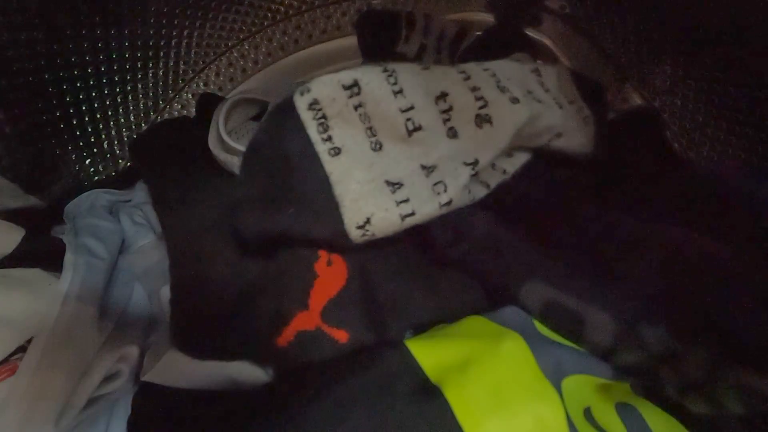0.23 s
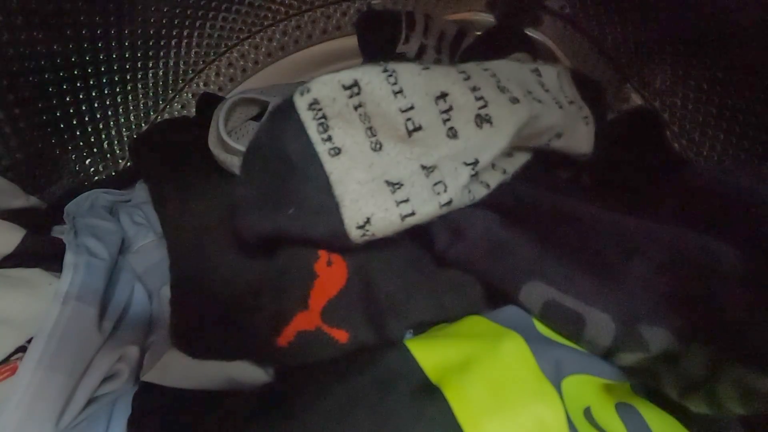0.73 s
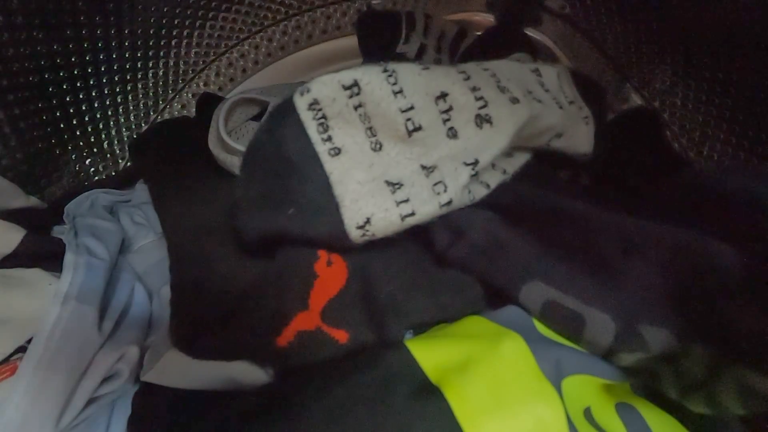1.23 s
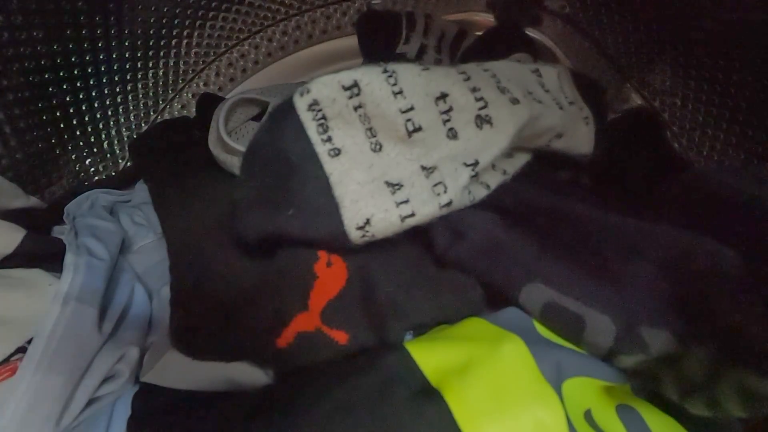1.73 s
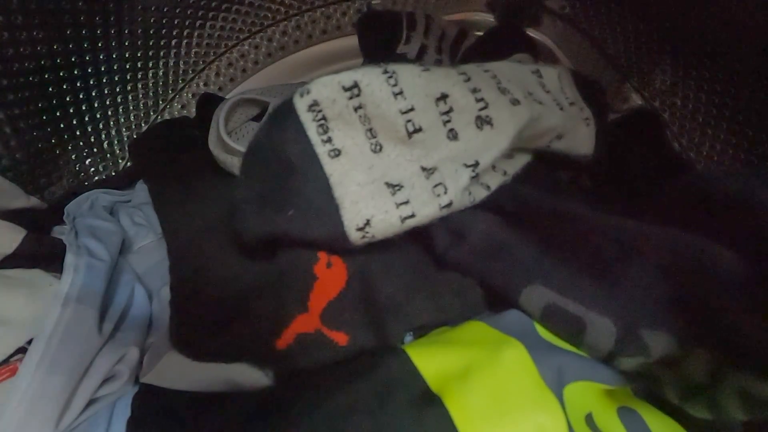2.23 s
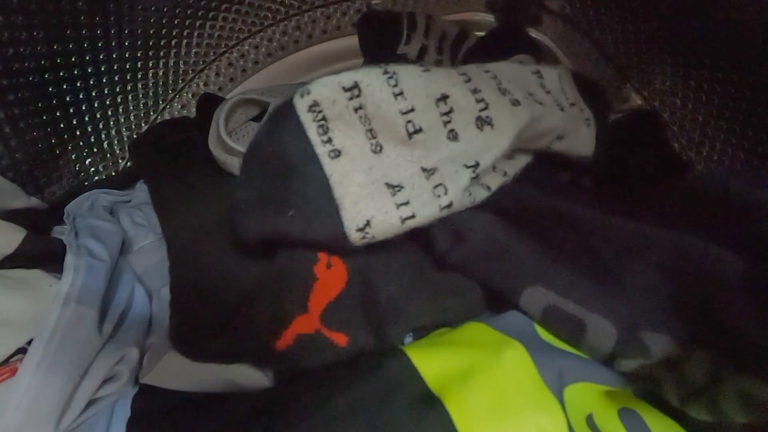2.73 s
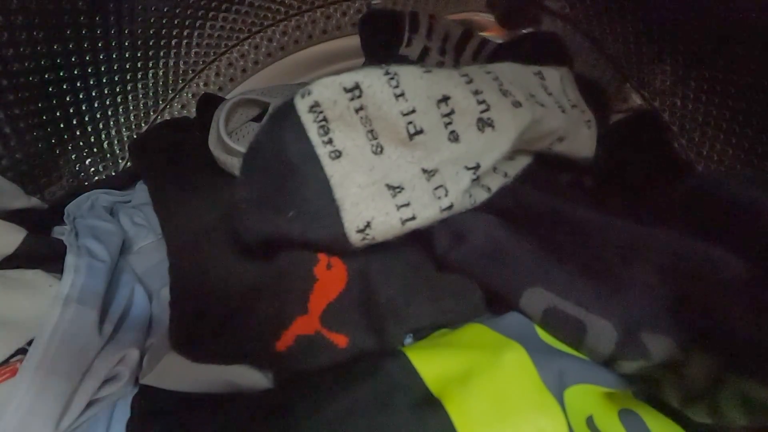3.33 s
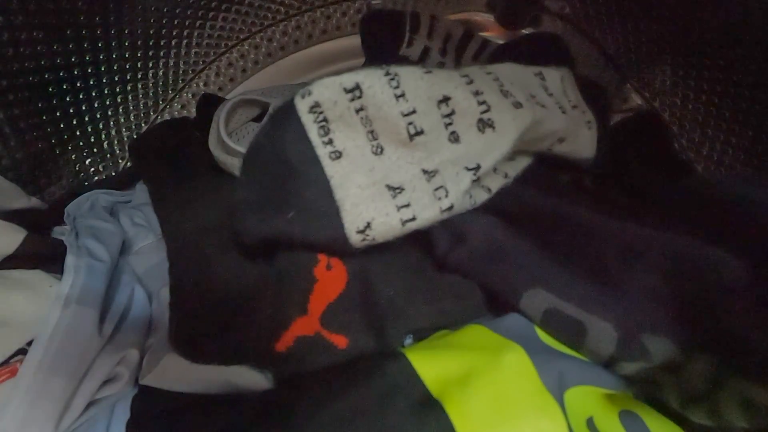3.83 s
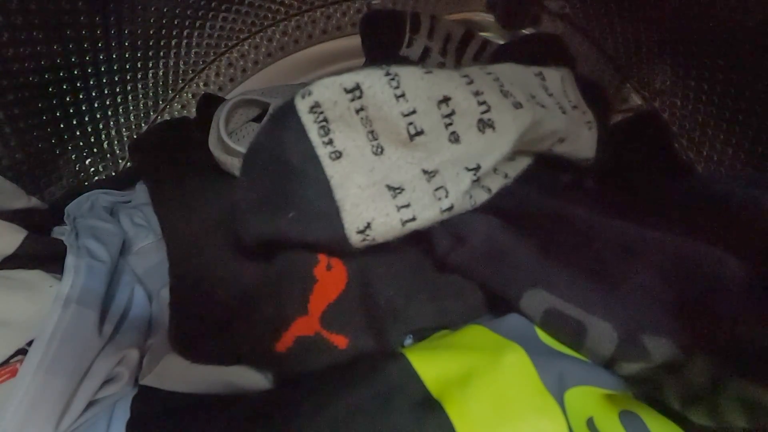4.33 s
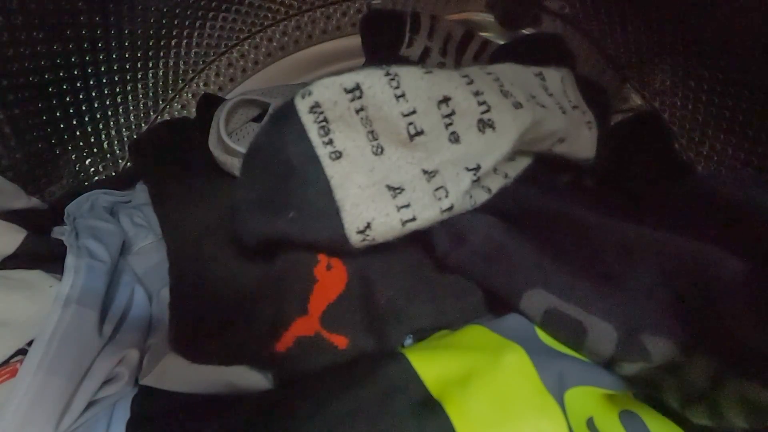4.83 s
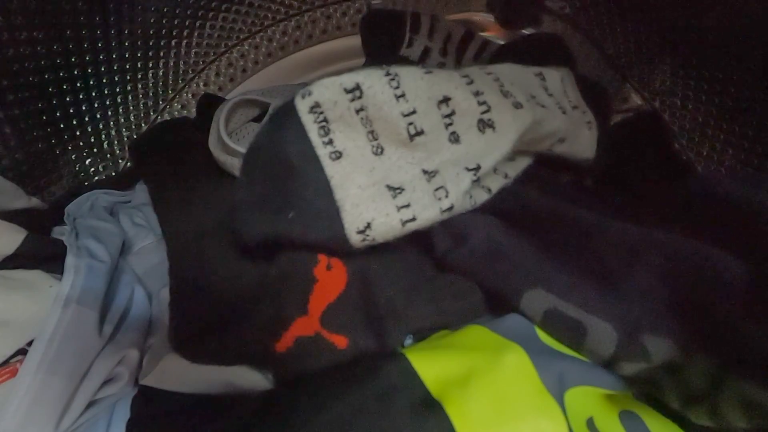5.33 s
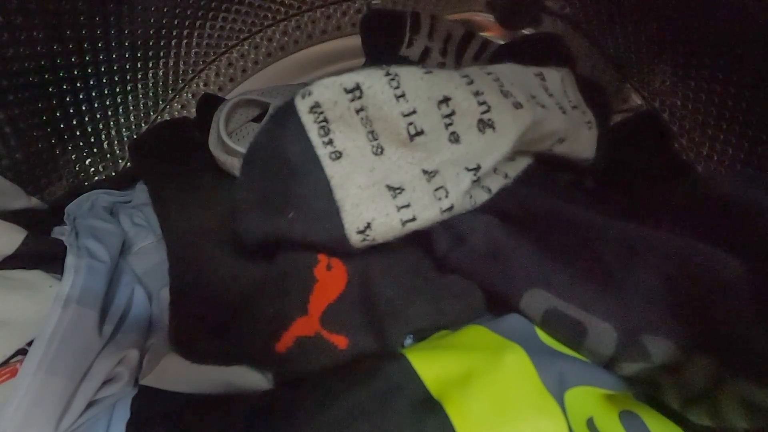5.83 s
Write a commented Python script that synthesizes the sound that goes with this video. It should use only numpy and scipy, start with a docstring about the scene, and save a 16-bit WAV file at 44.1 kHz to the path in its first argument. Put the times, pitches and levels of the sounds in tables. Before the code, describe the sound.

From inside a loaded washing machine comes the hiss of incoming water over a low, hollow rumble, soon joined by quick, sharp splashes on metal. Before the midpoint, a rattling knock cuts off the flow, the hose groans briefly and the tub gives a deep boom. Close spattering carries on for a while, then thins to small drips over the machine's faint background noise.

```python
"""A deep rumble and the hiss of water running into a washing machine drum, heard from among the clothes.
The jet drives the air modes of the drum and shakes the tub, and soon drops splash on the steel.
The valve shuts with a knock; the pressure wave makes the hose groan and the tub boom.
The last water splashes, trickles and drips over the faint background of the machine."""
import sys
import numpy as np
from scipy import signal
from scipy.fft import rfft, irfft, next_fast_len
from scipy.io import wavfile

SR = 44100
rng = np.random.default_rng(int(sys.argv[2]) if len(sys.argv) > 2 else 0)


def put_to_file(sound):
    """Save the sound as 16-bit audio at rate SR, in the file named by the first command-line argument."""
    columns = np.atleast_2d(sound).T  # one column per channel
    safe = np.clip(columns, -1, 1)
    whole_steps = np.round(safe * 32767)
    wavfile.write(sys.argv[1], SR, whole_steps.astype(np.int16))


N = 267907
FFT_SIZE = next_fast_len(N)


# swell and fade of the inflow: (time [s], drum roar [dB], jet hiss [dB])
FLOW = [(0.0, -41, -46), (1.15, -42.5, -48), (1.84, -43.5, -47), (2.38, -40.5, -47), (2.5, -39, -49),
        (2.69, -46, -51), (2.84, -44.5, -48.5), (2.94, -52, -61), (3.04, -52, -54), (3.28, -64.5, -53.5),
        (3.97, -66.5, -56), (4.45, -61.5, -66), (4.73, -72, -63), (5.26, -80, -65.5), (6.07, -82.5, -69)]
# hollow body, the drum's low air modes: (pitch [Hz], width [Hz], gain [dB])
DRUM_MODES = [(140.3, 110, -12.5), (210.5, 11, 4.5), (246.6, 21.5, -8.5), (368, 38.7, -5),
              (635.3, 88, -8.5), (766, 68, -6.5), (1160, 260, -24)]
# bright resonances among the clothes: (pitch [Hz], width [Hz], jet gain [dB], drop gain [dB])
CAVITY_MODES = [(1370, 31, -1.5, -27), (1800, 90, 4.5, 6.5), (2346, 225, -8, -1), (2750, 99, -1.5, 4.5),
                (3120, 155, 0, 0), (4147, 192, 2, -1), (4270, 117, 4.5, 0), (4660, 303, 1, 5),
                (5150, 433, -2, 0), (5610, 433, -7.5, -3.5), (6790, 340, -8, -3.5), (7800, 630, -16, -8.5),
                (10040, 3100, -36.5, -26), (11650, 410, -44, -20)]
JET_COLOUR, DROP_COLOUR = np.array(CAVITY_MODES)[:, :3], np.array(CAVITY_MODES)[:, [0, 1, 3]]
# thin whistles of the inlet: (pitch [Hz], width [Hz], gain [dB])
WHISTLES = [(3510, 91, -3.5), (4024, 29, 4.5), (5290, 57, -1), (5960, 57, -4.5), (6560, 90, -6),
            (7070, 63, -6)]

def inflow():
    """The jet's noise rings the drum's air and the gaps among the clothes; both levels waver."""
    roar_db, hiss_db = envelopes(FLOW)
    roar = rms_one(modes(rng.standard_normal(N), DRUM_MODES))
    roar *= from_db(roar_db + 1.77 * drift(rate_hz=3.9))
    jet = rng.standard_normal(N)
    hiss = rms_one(modes(jet, JET_COLOUR) + modes(jet, WHISTLES))
    hiss *= from_db(hiss_db + .8 * drift(rate_hz=20.9))
    return roar + hiss


# weight of the rumble, before and after the valve shuts: (time [s], rocking [dB], overtone [dB])
RUMBLE_LEVELS = [
    [(0.0, -13, -52), (0.03, -34.5, -35), (1.31, -25, -41), (1.39, -38.5, -42), (1.79, -25, -35),
     (1.86, -24.5, -42.5), (1.98, -24.5, -37.5), (2.04, -28.5, -56), (2.09, -40, -34.5), (2.25, -23, -32.5),
     (2.34, -27, -49.5), (2.46, -28.5, -30)],
    [(3.3, -36.5, -60), (3.42, -41, -68), (3.52, -33.5, -58), (3.67, -54, -59), (3.69, -44.5, -72),
     (3.79, -36, -59), (4.03, -50.5, -62.5), (4.82, -37, -59.5), (5.31, -55, -65.5), (5.45, -39.5, -62),
     (5.49, -39.5, -69.5), (6.07, -57.5, -69.5)],
]
# the tub's sway, rocking and overtone: (pitch [Hz], width [Hz], gain [dB])
TUB_MODES = [(42.5, 15, -3.5), (55.12, 10.3, 3), (112.3, 11.2, 0)]

def tub_rumble():
    """Turbulence rocks the tub on its springs in narrow modes."""
    rocking_db, overtone_db = envelopes(np.concatenate(RUMBLE_LEVELS))
    sway, rock, overtone = [from_db(db) * rough_tone(hz, width, top_hz=1.74 * hz)
                            for hz, width, db in TUB_MODES]
    return from_db(rocking_db) * rms_one(sway + rock) + from_db(overtone_db) * overtone


# up-front splashes: (time [s], peak [dB], centre [Hz], left over right [dB], spit peak [dB])
SPLASHES = [(0.8344, -35.5, 4470, 0.0, -58), (0.913, -37, 4060, -0.5, -49), (0.9393, -39, 4500, 6, -57),
            (1.0974, -34, 4560, 5, -54), (1.109, -23.5, 2750, -1.5, -67), (1.1332, -27.5, 4600, 0.5, -63),
            (1.1824, -15.5, 4440, 0, -61), (1.2478, -30.5, 3130, -1, -53), (1.366, -30.5, 6760, 2, -49),
            (1.3833, -31, 5100, 3, -45), (1.4352, -29, 4810, 3, -50), (1.4578, -26, 4700, 0.5, -54),
            (1.5124, -26.5, 4760, 5, -45), (1.533, -25, 4670, 0.5, -52), (1.5634, -28.5, 6900, 2, -48),
            (1.5953, -19, 4700, 1.5, -65), (1.6356, -25, 4640, 2, -62), (1.6632, -22, 3890, -2.0, -46),
            (1.696, -21, 4760, 2.0, -48), (1.7454, -28.5, 4700, 1.0, -51), (1.7684, -25.5, 4690, 0.0, -54),
            (1.8058, -27.5, 5140, 3, -58), (1.8874, -26, 4540, 2, -60), (1.9111, -28, 4900, 1.0, -51),
            (1.9543, -23, 4470, 2.5, -47), (2.0142, -20, 4470, 1.5, -55), (2.0452, -22, 4300, -3, -56),
            (2.0726, -22, 6300, 1, -48), (2.1076, -24.5, 5230, 3, -54), (2.184, -21, 4950, 4, -40),
            (2.1966, -17, 5130, -1.5, -53), (2.249, -26, 4700, 2, -48), (2.3273, -25.5, 5300, 3.5, -63),
            (2.409, -31, 6740, 1.5, -60), (2.426, -22.5, 4640, 1.5, -52), (2.45, -22, 4640, 1.5, -50),
            (2.5357, -28.5, 4800, 4, -58), (2.5572, -22.5, 4820, -2, -58), (2.658, -33, 4930, 5, -66),
            (2.6993, -25.5, 4830, 2, -47), (2.7432, -29.5, 4760, 4, -62), (2.7757, -27, 4600, 2.0, -66),
            (2.855, -31, 4660, 3, -52), (2.874, -28.5, 4550, 2, -49), (3.0626, -27.5, 4800, 2, -60),
            (3.225, -29.5, 4600, 1.0, -61), (3.274, -23.5, 5030, 4, -59), (3.288, -24, 4700, -1, -61),
            (3.3984, -28, 4800, 2, -54), (3.4364, -23, 6790, 2.0, -51), (3.454, -25.5, 6460, -1, -59),
            (3.5628, -24.5, 4660, 3, -61), (3.6051, -17, 4960, 3, -57), (3.6223, -21, 4830, 0, -55),
            (3.817, -28, 6640, 1, -68), (3.8861, -36, 5150, 8, -51), (3.929, -25.5, 4750, 5, -51),
            (3.9545, -18, 4190, 1, -38), (3.9786, -27.5, 6960, 1, -59), (4.0296, -34, 4800, 5, -58),
            (4.0632, -25, 4660, 2, -46), (4.135, -28, 4700, 1, -58), (4.1785, -26.5, 4900, 3, -69),
            (4.2233, -34, 7000, 1, -50), (4.2407, -31, 6960, 1.5, -47), (4.3515, -41, 4900, 1.0, -50),
            (4.3933, -25, 4800, 1, -56), (4.4241, -24, 3260, 1, -46), (4.468, -29, 3000, -3, -51),
            (4.6185, -16, 3900, 2, -61), (4.6464, -22.5, 4380, 1, -71), (4.6737, -10.5, 3790, -1.5, -62)]

def splashes():
    """Each splash is a short burst in its own band that rings the steel, with a spit of fine droplets."""
    out, t = np.zeros((2, N)), np.arange(int(.08 * SR)) / SR
    attack_s, t60_s, tail_t60_s = 0.0012, 0.026, 0.15
    decay = from_db(-60 * t / t60_s) + from_db(-22.5 - 60 * t / tail_t60_s)
    spit_band = signal.butter(3, [8000, 13000], "band", fs=SR, output="sos")
    for s, db, hz, pan_db, spit_db in SPLASHES:
        burst = rng.standard_normal(len(t)) * np.minimum(t / attack_s, 1) * decay
        band = resonate(resonate(burst, hz, 0.33 * hz), hz, 0.74 * hz)
        body = on_steel(band + from_db(-21.5) * burst)
        spit = signal.sosfilt(spit_band, burst)
        splash = from_db(db) * body / np.abs(body).max() + from_db(spit_db) * spit / np.abs(spit).max()
        add(out, s, from_db([[pan_db / 2], [-pan_db / 2]]) * splash)
    return out


# metallic ring of the drum wall: (pitch [Hz], width [Hz], gain [dB])
STEEL_MODES = [(4760, 120, -5), (4900, 150, -5), (6803, 146, -3.5)]

def on_steel(drops):
    """Drops sound through the gaps among the clothes and set the wall ringing."""
    return modes(drops, DROP_COLOUR) + modes(drops, STEEL_MODES)


# hits on the cabinet: (time [s], push [dB], rattle [dB], attack [s], rattle t60 [s])
KNOCKS = [(2.489, -11, -30.5, 0.0039, 0.057), (2.497, -10.5, -30.5, 0.0019, 0.065),
          (2.513, -19, -41, 0.0019, 0.16), (2.533, -17.5, -36.5, .002, 0.0497),
          (2.548, -19, -53, .002, 0.4), (3.055, -46, -80, 0.0028, 0.091), (4.424, -50, -68, 0.0012, 0.061),
          (4.434, -55, -51, 0.0026, 0.027), (4.469, -57, -63, .001, 0.072)]
# boxy ring of the cabinet: (pitch [Hz], gain [dB], t60 [s])
CABINET_MODES = [(57.4, -6.5, 0.41), (255, -5, 0.09), (90, 0, 0.11), (392, -10.5, 0.06),
                 (487, -14.5, 0.032), (627, -6.5, 0.036), (699, -9, 0.099), (805, -5, 0.045),
                 (1252, -25.5, 0.16), (1370, -9, 0.02), (1532, -19, 0.067), (1684, -12.5, 0.05),
                 (2350, -44, 0.039), (2830, -27, 0.11), (3524, -30, 0.025)]

def knocks():
    """A soft push rings every cabinet mode; a dying rattle of loose parts drives the upper ones."""
    out, t = np.zeros(N), np.arange(int(.5 * SR)) / SR
    low_cut = signal.butter(2, 500, "high", fs=SR, output="sos")
    high_cut = signal.butter(2, 3300, fs=SR, output="sos")
    for s, push_db, rattle_db, attack_s, rattle_t60 in KNOCKS:
        force = signal.sosfilt(low_cut, rng.standard_normal(len(t)))
        force *= from_db(rattle_db - 60 * t / rattle_t60)
        force[0] = from_db(push_db)
        knock = from_db(12) * signal.sosfilt(high_cut, force * (t > 0))  # rattle heard directly
        for k, (hz, mode_db, t60) in enumerate(CABINET_MODES):
            r, w = from_db(-60 / (t60 * SR)), 2 * np.pi * hz / SR
            ring = signal.lfilter([0, np.sin(w)], [1, -2 * r * np.cos(w), r * r], force)
            knock += (-1) ** k * from_db(mode_db) * ring
        add(out, s, knock * np.minimum(t / attack_s, 1))
    return out


# sub-bass ring-out of the tub: (pitch [Hz], level [dB], t60 [s])
BOOM_MODES = [(55.5, -9.5, 1.06), (43.6, -15.5, 0.91), (112.6, -28.5, .7)]

def tub_boom(start_s=2.885, attack_s=0.028):
    """The pressure wave gives the tub one slow shove and leaves it ringing."""
    t = np.maximum(np.arange(N) / SR - start_s, 0)
    rings = sum(from_db(db - 60 * t / t60) * np.sin(2 * np.pi * hz * t) for hz, db, t60 in BOOM_MODES)
    return np.minimum(t / attack_s, 1) * rings


# voice of the hose: (pitch [Hz], width [Hz], gain [dB])
HOSE_MODES = [(212.5, 36, -5), (224, 8.1, -4)]

def hose_groan(start_s=2.62, peak_s=2.86, end_s=3.0, rise_db_per_s=52, fall_db_per_s=115):
    """The pressure wave sloshes in the hose: two rough low tones swell and fade."""
    t = np.arange(N) / SR
    gate = np.clip(np.minimum(t - start_s, end_s - t) / 0.035, 0, 1)
    level_db = -35 + np.minimum(rise_db_per_s * (t - peak_s), fall_db_per_s * (peak_s - t))
    tones = sum(from_db(db) * rough_tone(hz, width, top_hz=250) for hz, width, db in HOSE_MODES)
    return gate * from_db(level_db) * rms_one(tones)


# pitched plinks, the first two from small early splashes: (time [s], starting pitch [Hz], level [dB])
DRIPS = [(0.952, 2400, -37), (0.989, 2620, -35.5), (2.317, 2440, -32), (3.588, 1370, -42.5),
         (3.689, 3060, -37), (3.913, 2320, -42), (4.223, 2380, -39.5), (4.514, 3150, -38),
         (4.769, 4940, -44), (4.889, 2370, -44.5), (4.888, 6690, -37.5), (4.9233, 4570, -35),
         (4.949, 3630, -41), (4.967, 3030, -40), (5.0, 1800, -48), (5.012, 6900, -43), (5.03, 6440, -35),
         (5.0604, 3760, -41), (5.105, 3880, -44), (5.161, 2880, -43), (5.2127, 2850, -47),
         (5.214, 6950, -47), (5.312, 4970, -41), (5.345, 5100, -39), (5.439, 4000, -48), (5.469, 3160, -52),
         (5.583, 3120, -43.5), (5.611, 2950, -38.5), (5.768, 4370, -39), (5.922, 6760, -41)]

def drips(t60_cycles=80):
    """Each plink rings briefly and rises in pitch, roughened by the breaking surface; most are trapped bubbles."""
    out, t = np.zeros(N), np.arange(int(.05 * SR)) / SR
    for s, hz, db in DRIPS:
        envelope = np.minimum(t / 0.002, 1) ** 2 * from_db(-60 * t * hz / t60_cycles)
        bubble = np.sin(2 * np.pi * hz * (t + 0.74 * t ** 2))
        noise = rng.standard_normal(len(t))
        scratch = .9 * rms_one(resonate(resonate(noise, hz, .12 * hz), hz, .2 * hz))
        add(out, s, from_db(db) * envelope * (bubble + scratch))
    return out


# sizzle of the spray: (time [s], level [dB])
SPRAY_LEVELS = [(0.8, -54.5), (1.27, -49), (1.9, -48), (2.12, -39.5), (2.25, -43), (2.68, -49), (2.85, -48),
                (3.84, -44), (4.06, -41.5), (4.35, -50), (4.54, -48.5), (4.7, -74), (5.14, -62),
                (6.07, -68.5)]

def spray():
    """Small drops tick on the steel at many pitches."""
    ticks = grains(per_s=400, spread_db=3.5, pitches=np.geomspace(3630, 12730, 10),
                   cycles=7.4, puff_s=0.0033)
    return from_db(envelopes(SPRAY_LEVELS)[0]) * rms_one(on_steel(ticks))


# ebb and flow of the trickle: (time [s], level [dB])
TRICKLE_LEVELS = [(0.8, -53), (1.08, -51), (2.41, -53), (2.88, -59.5), (3.07, -72), (3.82, -66), (4.1, -58),
                  (4.56, -53), (4.73, -65), (5.1, -59.5), (5.32, -70), (6.07, -68)]

def trickle():
    """Soft, dense bubbling of many sizes, coloured like the jet."""
    bubbles = grains(per_s=240, spread_db=4.5, pitches=np.geomspace(1153, 4000, 8),
                     cycles=6.5, puff_s=0.0049)
    coloured = modes(bubbles, JET_COLOUR) + from_db(-8) * bubbles
    return from_db(envelopes(TRICKLE_LEVELS)[0]) * rms_one(coloured)


# tone of the noise bed: (frequency [Hz], gain [dB])
BED_EQ = [(76, -30), (130, -0.5), (278, -12.5), (351, -12.5), (668, -28.5), (1200, -17), (1770, -6),
          (3370, -26.5), (4870, -23), (7930, -18.5), (9270, -56), (11900, -32.5), (13700, -52.5)]

def machine_bed(level_db=-64):
    """Faint steady background noise of the machine."""
    spectrum = rfft(rng.standard_normal(N), FFT_SIZE) * from_db(over_frequency(BED_EQ))
    return from_db(level_db) * rms_one(irfft(spectrum, FFT_SIZE)[:N])


# stereo balance: (frequency [Hz], left over right [dB])
BALANCE = [(60, 1), (110, 3.5), (200, -1), (360, 4.5), (660, -2.5), (1200, 0), (2190, -7.5), (3990, 0),
           (7270, 0.5), (13200, -6)]
# stereo phase: (frequency [Hz], left lead [rad])
LEFT_LEAD = [(130, 0), (520, -.9), (860, -.9), (1120, .6), (1890, .4), (2150, 1.9), (2410, .4), (2840, 1.2),
             (3360, .2), (3700, 1.4), (3960, -.6), (4570, 0)]
# width from scattered sound: (frequency [Hz], side gain [dB])
SIDE_EQ = [(60, -31.5), (250, -31.5), (600, -10.5), (1200, -6.5), (2400, -9), (4500, -12), (8000, -24),
           (12000, -5)]

def stereo_image(direct, scattered):
    """Left and right differ in level and phase by pitch; scattered sound reaches them in opposition."""
    left = from_db(over_frequency(BALANCE) / 2) * np.exp(.5j * over_frequency(LEFT_LEAD))
    side = from_db(over_frequency(SIDE_EQ)) * rfft(scattered, FFT_SIZE)
    spectra = rfft(direct, FFT_SIZE) + side * [[1], [-1]]
    return irfft(spectra * np.array([left, 1 / left]), FFT_SIZE)[:, :N]


def grains(per_s, spread_db, pitches, cycles, puff_s, start_s=0.8):
    """Random puffs of noise in clumps, each ringing some cycles at one of the pitches; rms 1."""
    born = rng.random(N) < per_s * from_db(2.5 * drift(rate_hz=15)) / SR
    sizes = born * from_db(spread_db * np.minimum(rng.exponential(1, N), 3))
    pitch_index = rng.integers(0, len(pitches), N)
    noise, rings = rng.standard_normal(N), np.zeros(N)
    decay = np.exp(-1 / (puff_s * SR))
    for k, hz in enumerate(pitches):
        puffs = noise * signal.lfilter([1], [1, -decay], sizes * (pitch_index == k) + 1e-18)
        rings += resonate(resonate(puffs, hz, 2 * hz / cycles), hz, 11 * hz / cycles) / np.sqrt(hz)
    return rms_one(rings * (np.arange(N) / SR > start_s))


def rough_tone(hz, width_hz, top_hz):
    """A narrow band of noise, its random beating partly evened out and its top rolled off; rms 1."""
    band = rms_one(resonate(resonate(rng.standard_normal(N), hz, width_hz), hz, 2.3 * width_hz))
    beating = np.abs(signal.hilbert(band, FFT_SIZE)[:N]) + 1e-9
    high_cut = signal.butter(4, top_hz, fs=SR, output="sos")
    return rms_one(signal.sosfiltfilt(high_cut, band / np.sqrt(beating)))


def resonate(x, hz, width_hz):
    """One resonance of gain 1 at its top."""
    r = np.exp(-np.pi * width_hz / SR)
    feedback = [1, -2 * r * np.cos(2 * np.pi * hz / SR), r * r]
    return signal.lfilter(np.array([1, 0, -1]) * (1 - r * r) / 2, feedback, x + 1e-18)


def modes(x, table):
    """Parallel resonances of alternating sign."""
    return sum((-1) ** k * from_db(db) * resonate(x, hz, width)
               for k, (hz, width, db) in enumerate(table))


def drift(rate_hz):
    """Slow random wander of rms 1."""
    hop = 40
    r = np.exp(-2 * np.pi * rate_hz * hop / SR)
    slow = signal.lfilter([1], [1, -2 * r, r * r], rng.standard_normal(N // hop + 2002))[2000:]
    return np.interp(np.arange(N) / hop, np.arange(len(slow)), rms_one(slow))


def envelopes(rows):
    """Each level column of a timed table, at every sample."""
    s, *columns = np.transpose(rows)
    return [np.interp(np.arange(N) / SR, s, column) for column in columns]


def over_frequency(points):
    """A curve over log frequency, at every FFT bin."""
    hz, value = np.transpose(points)
    return np.interp(np.log(np.fft.rfftfreq(FFT_SIZE, 1 / SR) + 1), np.log(hz + 1), value)


def from_db(db):
    """Gain of a level."""
    return 10 ** (np.asarray(db) / 20)


def rms_one(x):
    """Scaled to rms 1."""
    return x / np.sqrt(np.mean(x ** 2) + 1e-20)


def add(out, s, sound):
    """Lays a sound in at a time."""
    i = int(s * SR)
    out[..., i:i + sound.shape[-1]] += sound[..., :N - i]


def scene():
    """All sources arrive directly, and again 17 ms later by a longer way round the drum."""
    wash = inflow() + spray() + trickle() + machine_bed() + tub_rumble()
    direct = wash + drips() + knocks() + tub_boom() + hose_groan() + splashes()
    delay = int(.017 * SR)
    lead_in = wash[delay:0:-1]  # the water is already running at the start
    scattered = np.concatenate([lead_in, direct[0, :-delay]])
    return stereo_image(direct, scattered)


def record(dry):
    """The deepest bass is rolled off and the top is cut steeply."""
    thinned = signal.sosfilt(signal.butter(2, 30, "high", fs=SR, output="sos"), dry)
    return signal.sosfilt(signal.butter(14, 13850, fs=SR, output="sos"), thinned)


dry = scene()
out = record(dry)
put_to_file(out)
```